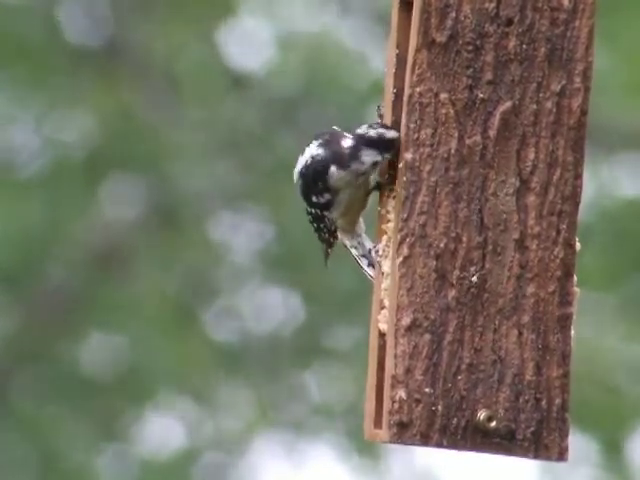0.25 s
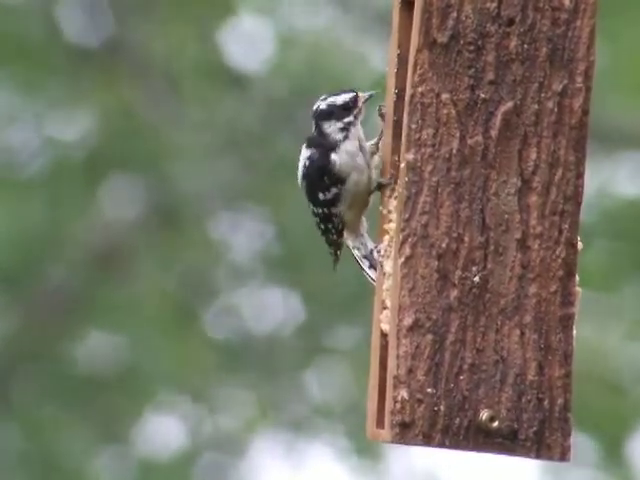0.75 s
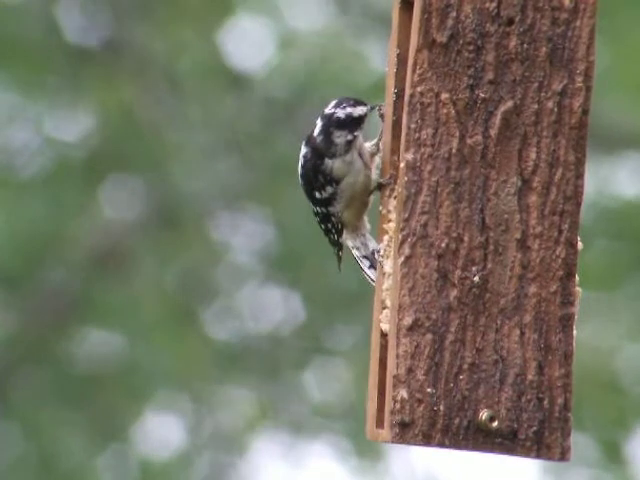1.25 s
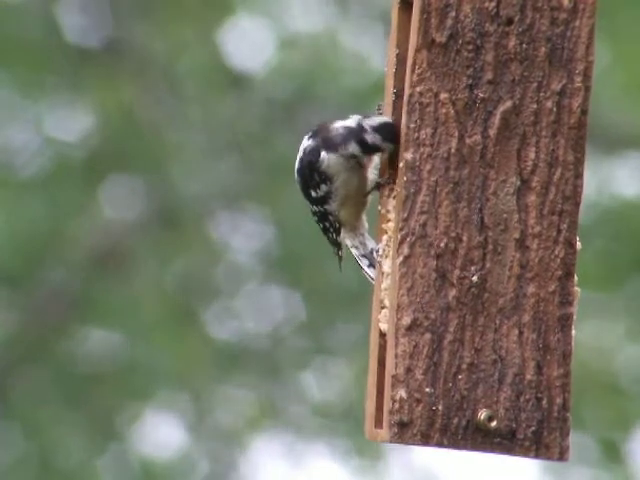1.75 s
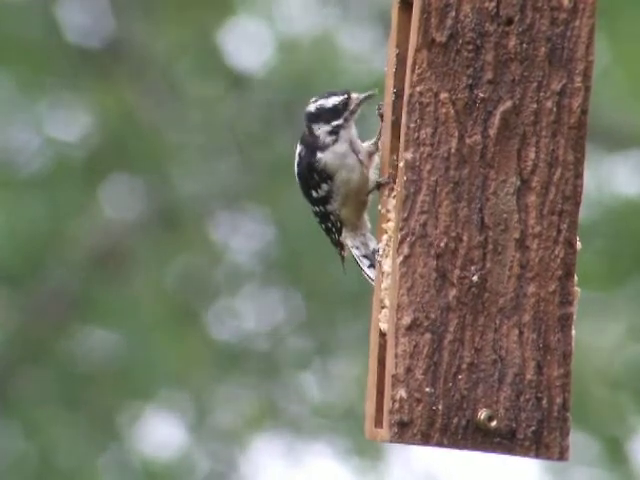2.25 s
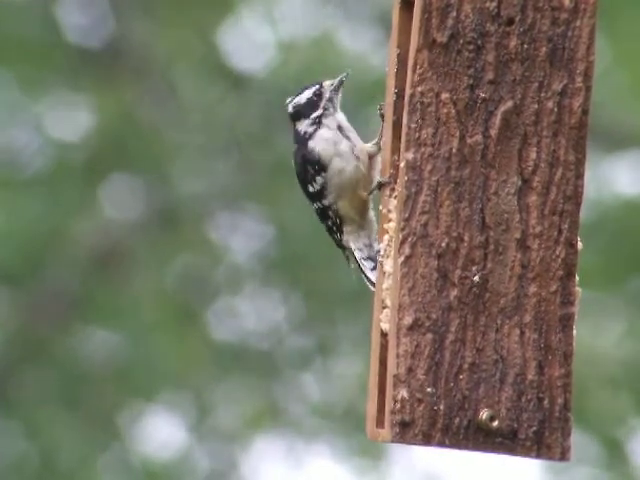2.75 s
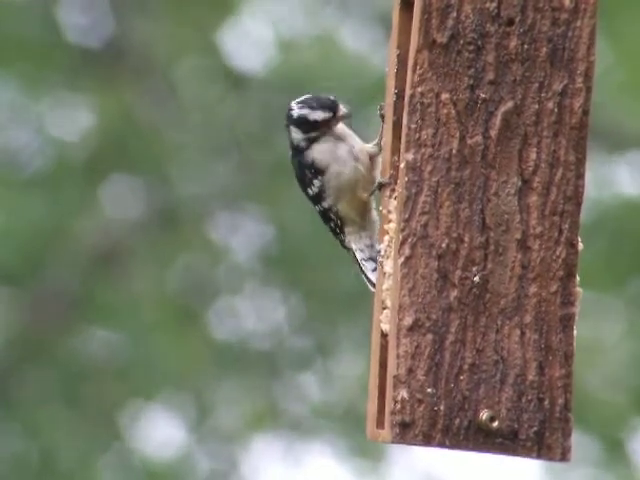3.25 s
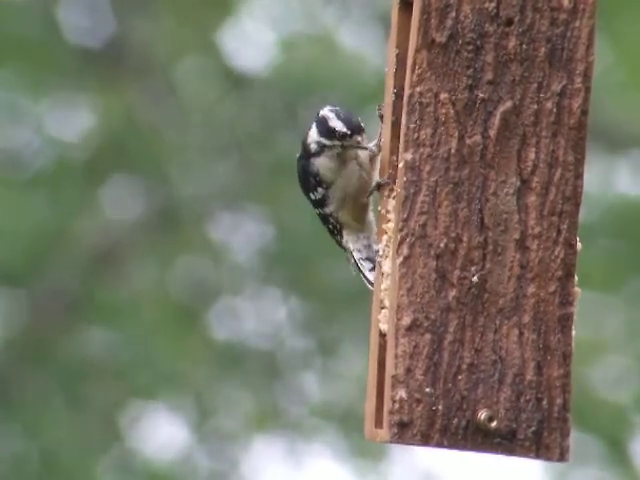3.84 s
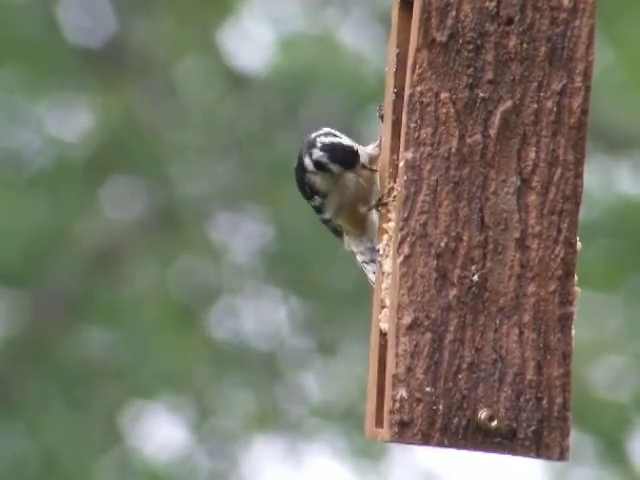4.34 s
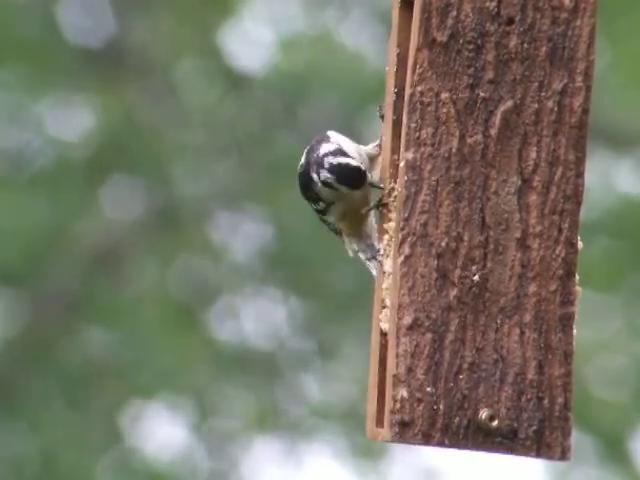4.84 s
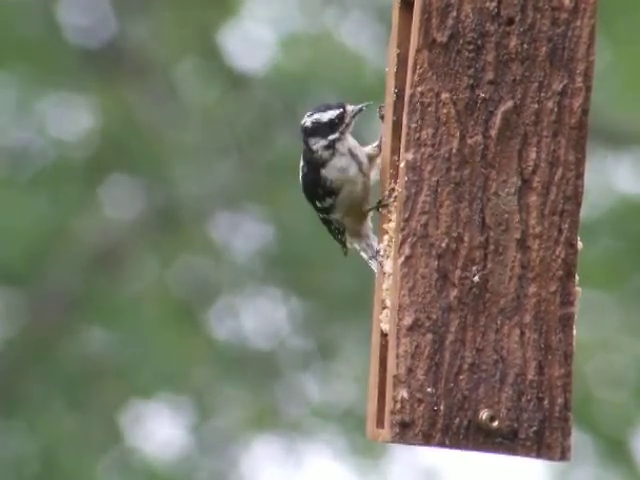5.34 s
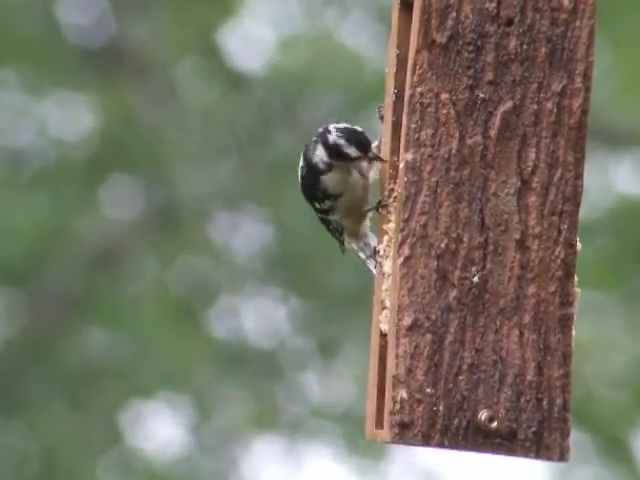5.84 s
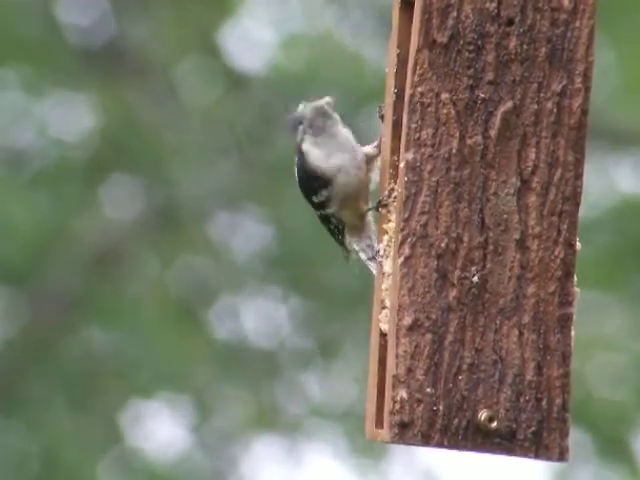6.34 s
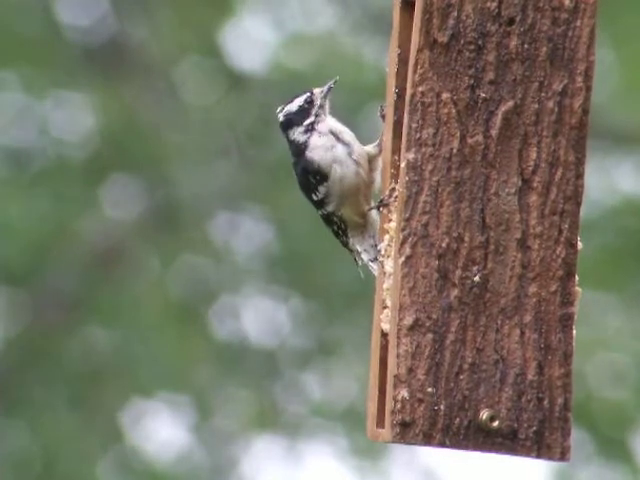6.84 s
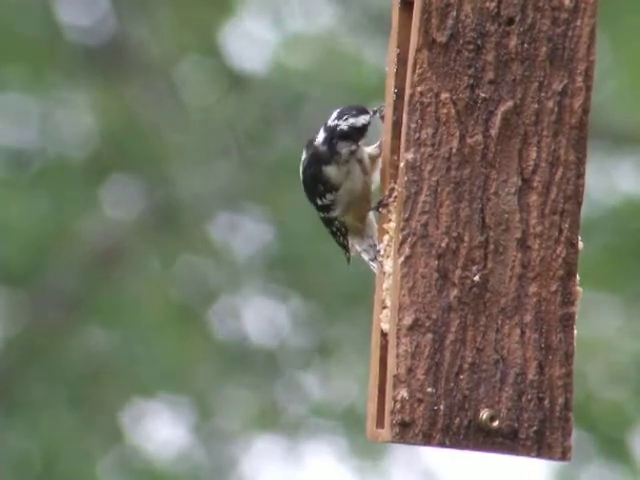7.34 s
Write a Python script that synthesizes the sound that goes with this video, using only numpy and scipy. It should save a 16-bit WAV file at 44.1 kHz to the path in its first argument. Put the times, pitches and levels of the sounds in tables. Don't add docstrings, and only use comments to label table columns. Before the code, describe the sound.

Outdoors in a garden, quick uneven beak taps strike wood and fatty food: a busy opening flurry, scattered pecks, a bright scrape and crunchy cluster, a brief creaky rub of the hanging feeder, then the hardest cracks. Later pecks are softer and sparser, with one last tap at the end. Low distant traffic, faint insects and gritty low-quality microphone noise lie underneath, and a tiny far bird whistle is nearly lost.

```python
import sys
import numpy as np
from scipy import signal
from scipy.fft import rfft, irfft
from scipy.io import wavfile

SR = 44100
rng = np.random.default_rng(int(sys.argv[2]) if len(sys.argv) > 2 else 0)


def inscribe(sig):
    pcm = np.round(np.clip(np.atleast_2d(sig).T, -1, 1) * 32767)
    wavfile.write(sys.argv[1], SR, pcm.astype(np.int16))


def volts_from_decibels(level):
    exponent = np.asarray(level, float) / 20
    return 10 ** exponent


N = 335601

# f/Hz, density level/dB
TRAFFIC_SPECTRUM = [(12, -13), (50, -9.5), (140, -9.5), (220, -17), (400, -21.5), (1000, -22),
                    (3000, -27.5), (8000, -33)]
# t/s, level/dB
DRONE_LEVEL = [(0.0, -72.5), (1.06, -77.5), (1.21, -62), (2.71, -61.5), (3.37, -76), (4.09, -66.5),
               (4.4, -73.5), (5.15, -61.5), (6.0, -72.5), (7.61, -65)]
# t/s, drone level/dB, insect level/dB
PASSING_LEVELS = [(0, -90, -73), (1.5, -90, -71), (4.4, -88, -72), (4.75, -71, -80), (5.3, -71, -86),
                  (5.6, -88, -86), (7.61, -90, -86)]
# f/Hz, width/Hz
PASSING_BANDS = [
    [(124, 8)],
    [(400, 13)],
    [(6930, 45), (7015, 49)],
]
# f/Hz, width/Hz, level/dB
STEADY_BANDS = [
    (78.52, 12, -68),
    (6975, 900, -67),
]
# t/s, level/dB
BREEZE = [(0.0, -53.5), (.08, -42.5), (.21, -42), (.38, -57), (1.7, -59.5), (2.3, -70), (4.0, -65),
          (4.45, -55), (4.7, -65.5), (7.61, -66)]
# f/Hz, level/dB
WHINE_TONES = [(7677, -73), (7709, -72), (7736, -81.5)]

# f/Hz, width/Hz, level/dB
CAVITY_MODES = [(524, 39, 5.5), (769, 50, 8.5)]
# f/Hz, width/Hz, level/dB
BOARD_MODES = [(726, 240, -6.5), (1142, 350, -3.5), (1550, 410, 0.5), (2164, 270, -3), (2358, 320, -2.5)]
# f/Hz, width/Hz, level/dB
BARK_MODES = [(3068, 500, -9.5), (3734, 310, 3.5), (4040, 1000, -8), (4975, 450, 4.5), (6170, 200, -8),
              (6770, 500, 2), (7390, 700, -1)]

# t/s, peak level/dB, board level/dB, board f/Hz, beak f/Hz
JAB_BLOWS = [(.416, -13.5, -19.5, 1090, 6340), (0.466, -19.5, -12, 1990, 6900),
             (.567, -18, -15.5, 1840, 7450), (0.7241, -15, -12.5, 2250, 6900),
             (0.837, -12.5, -15.5, 2830, 6930), (1.4192, -15.5, -12.5, 1355, 6800),
             (3.5799, -8.5, -31, 1080, 6860), (3.6687, -20.5, -13, 1900, 3470),
             (4.0337, -16.5, -16, 2010, 6980), (1.9198, -28, -40, 1690, 6600),
             (4.3173, -4, -17, 1550, 5800), (5.2793, -15, -17, 1144, 6820), (5.2951, -32.5, -9, 2400, 6910)]
# t/s, peak level/dB, board level/dB, beak f/Hz
DIG_BLOWS = [(.494, -21.5, -14, 4650), (0.8988, -30, -8, 3050), (1.3387, -28, -12, 3160),
             (1.6509, -19, -33.5, 3760), (2.189, -33.5, -13, 7100), (2.706, -22.5, -9.5, 5740),
             (2.8859, -28, -28, 3300), (2.903, -13.5, -16, 4940), (2.9406, -21.5, -11, 3740),
             (2.9634, -11.5, -12, 2990), (3.5745, -23.5, -15, 3670), (4.0526, -27, -20, 3720),
             (4.282, -27, -14, 3830), (4.2936, -15.5, -13, 7160), (4.349, -32, -2.5, 5800),
             (5.2623, -19, -14, 3400), (5.3219, -28.5, -9, 3420), (5.4083, -27.5, -11.5, 2590),
             (5.4462, -20, -13.5, 7330), (5.5431, -10, -18.5, 5780), (5.8604, -23.5, -15.5, 3200),
             (6.109, -24.5, -13, 3070), (6.3132, -28, -14, 3090), (7.5865, -29.5, -8, 3140)]
# t/s, peak level/dB, beak f/Hz
SCRAPE_BLOWS = [
    (0.4408, -27.5, 4820),
    (2.77, -25, 2960),
    (2.7842, -14, 6460),
    (3.9723, -27.5, 7100),
]
# t/s, peak level/dB
NIBBLE_BLOWS = [(.5242, -36), (0.541, -40), (0.9142, -39.5), (0.975, -40.5), (1.3662, -36.5), (1.395, -37),
                (0.451, -29), (1.504, -29.5), (1.5847, -36), (1.616, -34), (1.8158, -32), (2.8836, -33),
                (3.0425, -39), (3.8898, -35.5), (3.9942, -32.5), (5.1573, -31), (5.3095, -36), (5.602, -42),
                (2.6806, -37.5), (3.603, -40)]
# t/s, peak level/dB, f/Hz
CAVITY_BOOMS = [(.416, -30, 1053), (.442, -38, 565), (.492, -33.5, 960), (.568, -33, 544), (.723, -30, 565),
                (.836, -37, 543), (1.341, -44, 780), (1.586, -48, 750), (1.654, -44, 530),
                (2.938, -51, 840), (2.965, -29.5, 762), (3.044, -41.5, 780), (3.579, -32, 1050),
                (3.669, -42, 755), (4.036, -40.5, 810), (4.292, -41, 790), (4.319, -31.5, 688),
                (5.295, -45, 916), (5.263, -44, 990), (5.321, -42, 880), (5.41, -47, 764),
                (5.86, -47.5, 737), (6.11, -47, 800), (5.545, -40.5, 870), (4.352, -38.5, 820),
                (7.589, -44, 774)]
# t/s, level/dB
HOOK_RUBS = [
    [(2.985, -50), (2.989, -44.5), (3.099, -53), (3.111, -63), (3.13, -72)],
    [(3.48, -67), (3.505, -50.5), (3.575, -49)],
]
# t/s, f/Hz, level/dB
BIRD_WHISTLE = [(6.188, 4080, -66), (6.198, 3950, -62), (6.213, 3620, -64), (6.228, 3250, -68)]
# delay t/s, level/dB, smear t/s
REFLECTIONS = [
    (.0055, -14, 0.0032),
    (0.0309, -21.5, .005),
    (0.054, -24.5, .008),
]

TRAFFIC_DB, HISS_DB = -55.5, -60.5
GUST_DB, GUST_HZ = 3.5, 1.5
JAB_CRUNCH_DB, DIG_CRUNCH_DB, SCRAPE_CRUNCH_DB, NIBBLE_CRUNCH_DB = -13, -0.5, 9, -2
SUET_BOARD_HZ, SCRAPE_BOARD_DB = 2060, -15.5
NIBBLE_BOARD_DB, NIBBLE_BOARD_HZ, NIBBLE_BEAK_HZ = -10.5, 1740, 3940
BOOM_CYCLES = 24
GARDEN_T60_S, GARDEN_DB = 0.37, -20
STEP, OFFSET = 0.00553, 0.06


def level(x, db):
    return x * volts_from_decibels(db) / np.sqrt(np.mean(x ** 2))


def ring(x, hz, width_hz):
    b, a = signal.iirpeak(min(hz, SR / 2.2), hz / width_hz, fs=SR)
    return signal.lfilter(b, a, x)


def curve(rows, column=1):
    rows = np.array(rows)
    return np.interp(np.arange(N) / SR, rows[:, 0], rows[:, column])


def walk(rate_hz):
    lowpass = signal.butter(2, rate_hz, fs=SR, output="sos")
    settled = signal.sosfilt(lowpass, rng.standard_normal(N + SR))[SR:]
    return level(settled, 0)


def narrow(hz, width_hz):
    once = ring(rng.standard_normal(N), hz, width_hz)
    return level(ring(once, hz, width_hz), 0) * volts_from_decibels(1.4 * walk(2.5))


def distance():
    hz, db = np.transpose(TRAFFIC_SPECTRUM)
    bins = np.fft.rfftfreq(N, 1 / SR)
    shape = volts_from_decibels(np.interp(np.log(bins + 1), np.log(hz), db))
    wash = irfft(rfft(rng.standard_normal(N)) * shape, N)
    out = level(wash, TRAFFIC_DB) * volts_from_decibels(0.75 * walk(1.0))
    levels = curve(DRONE_LEVEL), curve(PASSING_LEVELS), curve(PASSING_LEVELS, column=2)
    for db, bands in zip(levels, PASSING_BANDS):
        for hz, width in bands:
            out = out + volts_from_decibels(db) * narrow(hz, width)
    for hz, width, db in STEADY_BANDS:
        out = out + volts_from_decibels(db) * narrow(hz, width)
    breeze_db = curve(BREEZE) - 2.5 + GUST_DB * walk(GUST_HZ)
    return out + narrow(22.0, 25.0) * volts_from_decibels(breeze_db)


def whine():
    t = np.arange(N) / SR
    return sum(np.sqrt(2) * volts_from_decibels(db) * np.sin(2 * np.pi * hz * t) for hz, db in WHINE_TONES)


def hiss():
    return volts_from_decibels(HISS_DB) * rng.standard_normal(N)


def blows():
    rows = [(*row, JAB_CRUNCH_DB) for row in JAB_BLOWS]
    for s, db, board_db, hz in DIG_BLOWS:
        rows.append((s, db, board_db, SUET_BOARD_HZ, hz, DIG_CRUNCH_DB))
    for s, db, hz in SCRAPE_BLOWS:
        rows.append((s, db, SCRAPE_BOARD_DB, SUET_BOARD_HZ, hz, SCRAPE_CRUNCH_DB))
    for s, db in NIBBLE_BLOWS:
        rows.append((s, db, NIBBLE_BOARD_DB, NIBBLE_BOARD_HZ, NIBBLE_BEAK_HZ, NIBBLE_CRUNCH_DB))
    return rows


def body(push, modes, chance, scatter_db):
    out = 0
    for k, ((hz, width, db), (share, detune)) in enumerate(zip(modes, chance)):
        mode = ring(push, hz * (1 + 0.029 * detune), width) / np.sqrt(width)
        out = out + volts_from_decibels(db + scatter_db * share) * (-1) ** k * mode
    return out / np.abs(out).max()


def taps():
    out, size = np.zeros(N + SR), SR // 8
    t = np.arange(size) / SR
    crack = t / 0.0004 * np.exp(1 - t / 0.0004)
    crunch = (1 - np.exp(-t / 0.0014)) * np.exp(-t / 0.0049)
    rows = blows()
    noise = rng.standard_normal((len(rows), size))
    chance = rng.standard_normal((len(rows), 16, 2))
    for (s, db, board_db, board_hz, beak_hz, crunch_db), grit, c in zip(rows, noise, chance):
        push = grit * (0.33 * crack + volts_from_decibels(crunch_db) * crunch)
        push[size // 300] += 4.5
        beak = ring(push, beak_hz, 900.0) + 0.33 * ring(push, 5600.0, 9000.0)
        bright = beak / np.abs(beak).max() + 0.5 * body(push, BARK_MODES, c[8:], 2.4)
        bright = bright / np.abs(bright).max()
        wood = body(push, BOARD_MODES + [(board_hz, 450, 4)], c, 2.9)
        i = int(s * SR)
        out[i:i + size] += volts_from_decibels(db) * (bright + volts_from_decibels(board_db + 4) * wood)
    return out[:N]


def booms():
    out, t = np.zeros(N + SR), np.arange(SR // 6) / SR
    noise = rng.standard_normal((len(CAVITY_BOOMS), len(t)))
    for (s, db, hz), grit in zip(CAVITY_BOOMS, noise):
        push = grit * t * np.exp(-t / 0.002)
        hum = ring(push, hz, np.log(1000) / np.pi * hz / BOOM_CYCLES)
        rattle = grit * np.exp(-t / 0.0087)
        blur = ring(ring(rattle, 780.0, 800.0), 780.0, 800.0)
        i = int((s + 0.00065) * SR)
        out[i:i + len(t)] += volts_from_decibels(db - 2) * (hum / np.abs(hum).max() + 0.78 * blur / np.abs(blur).max())
    return out[:N]


def sway():
    slips = rng.standard_normal(N) * volts_from_decibels(2.9 * walk(90) - 2)
    hum = 0
    for hz, width, db in CAVITY_MODES + BOARD_MODES:
        hum = hum + volts_from_decibels(db) * ring(slips, hz, width) / np.sqrt(width)
    t = np.arange(N) / SR
    swing = sum(volts_from_decibels(curve(rub)) * (t > rub[0][0]) * (t < rub[-1][0]) for rub in HOOK_RUBS)
    return level(hum, 0) * swing


def chirp():
    t = np.arange(N) / SR
    gate = (t > BIRD_WHISTLE[0][0]) * (t < BIRD_WHISTLE[-1][0])
    phase = 2 * np.pi * np.cumsum(curve(BIRD_WHISTLE)) / SR
    return np.sqrt(2) * gate * volts_from_decibels(curve(BIRD_WHISTLE, column=2)) * np.sin(phase)


def garden():
    t = np.arange(SR // 2) / SR
    decay = np.log(1e6) / GARDEN_T60_S * volts_from_decibels(-120 * t / GARDEN_T60_S)
    power = volts_from_decibels(2 * GARDEN_DB) * decay * np.clip(t / 0.0099, 0, 1)
    for delay, db, smear in REFLECTIONS:
        power = power + volts_from_decibels(2 * db) / smear * np.exp(-np.abs(t - delay) / smear) * (t > delay)
    response = np.sqrt(power / SR) * rng.standard_normal(len(t))
    response[0] = 1
    return response


def scene():
    feeder = taps() + booms() + sway()
    near = signal.fftconvolve(feeder, garden())[:N]
    return (near + chirp() + distance() + whine() + hiss())[None]


def low_pass(x):
    return signal.sosfilt(signal.butter(12, 9420, fs=SR, output="sos"), x)


def record(dry):
    leaky = signal.firwin(16 * 441 + 1, 1.12 / 441)
    slow = signal.resample_poly(dry, 160, 441, axis=1, window=leaky)
    steps = STEP * np.floor(slow / STEP + OFFSET)
    smooth = signal.firwin(32 * 441 + 1, 1.0 / 441, window=("kaiser", 9))
    wide = signal.resample_poly(steps, 441, 160, axis=1, window=smooth)[:, :N]
    return low_pass(wide)


dry = scene()
out = record(dry)
inscribe(out)
```